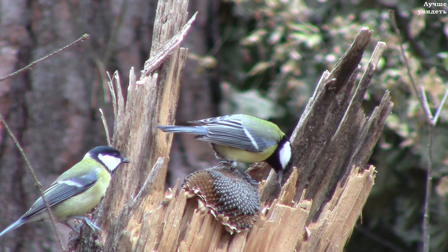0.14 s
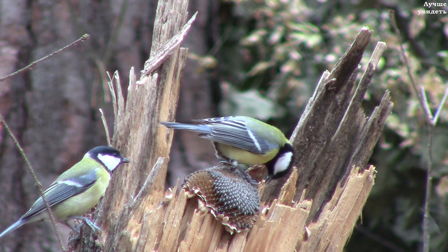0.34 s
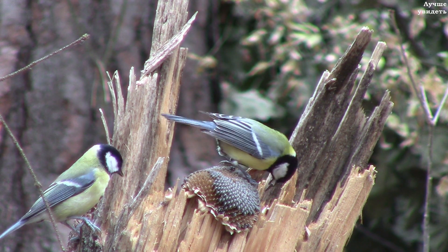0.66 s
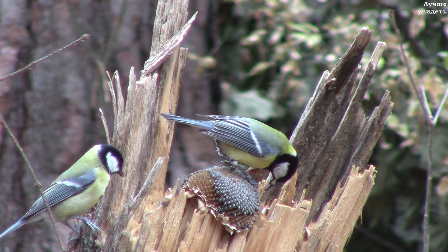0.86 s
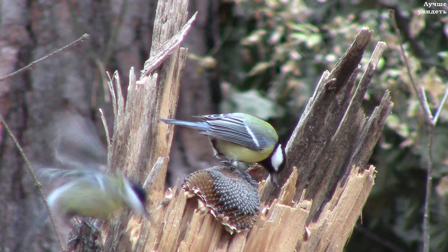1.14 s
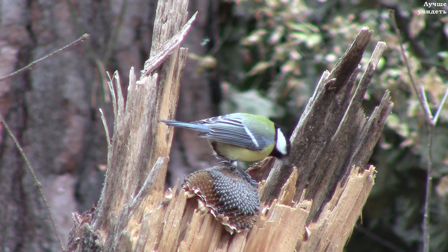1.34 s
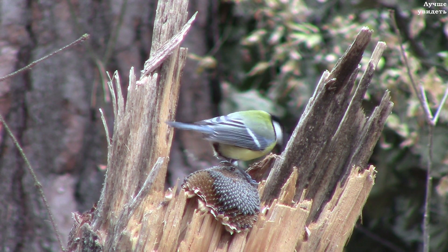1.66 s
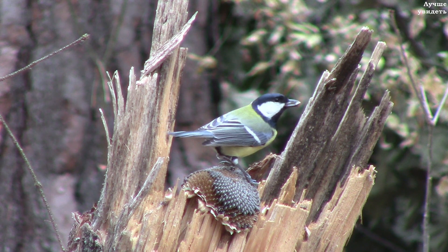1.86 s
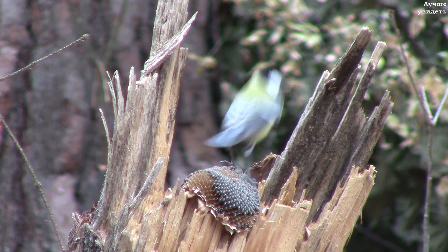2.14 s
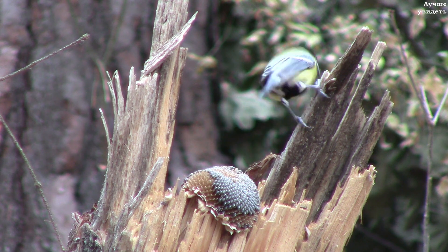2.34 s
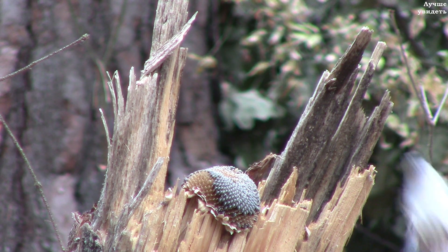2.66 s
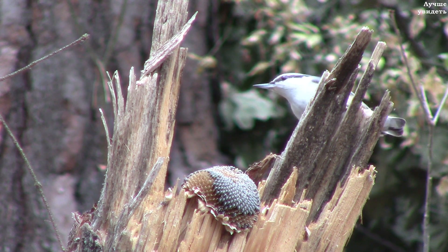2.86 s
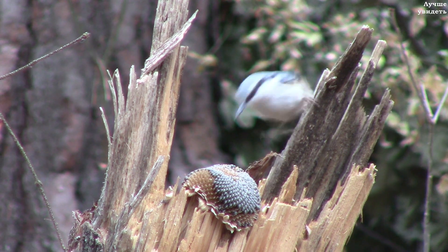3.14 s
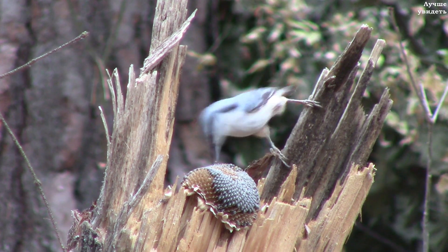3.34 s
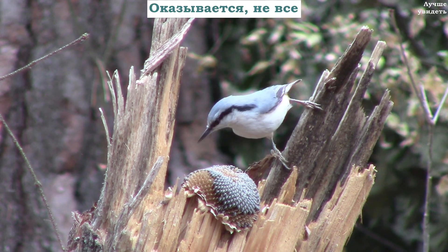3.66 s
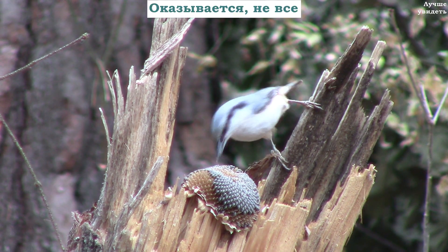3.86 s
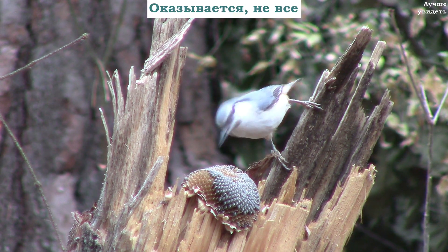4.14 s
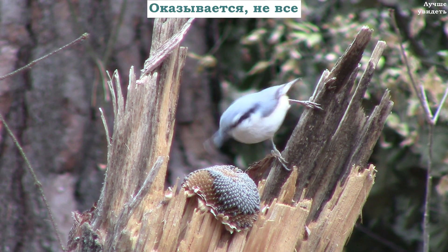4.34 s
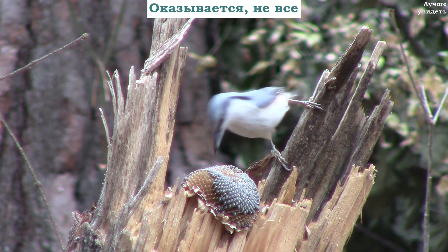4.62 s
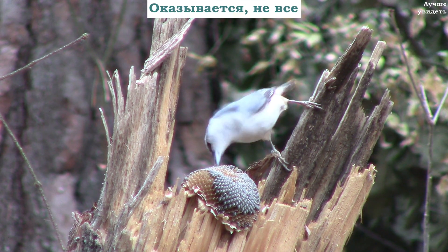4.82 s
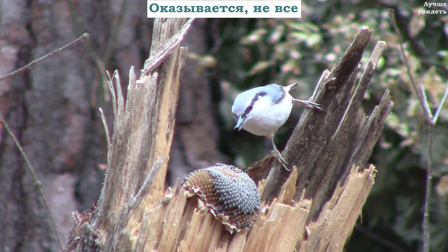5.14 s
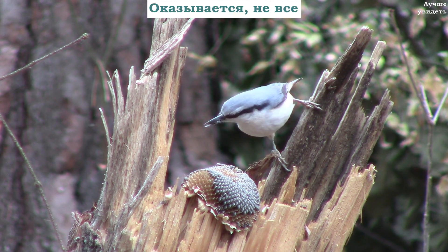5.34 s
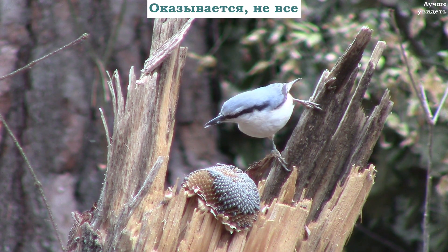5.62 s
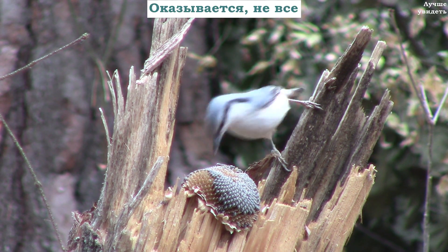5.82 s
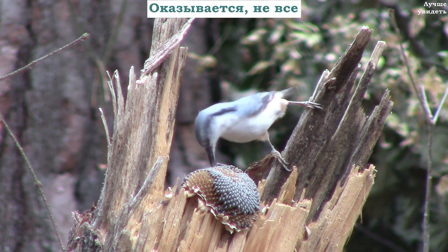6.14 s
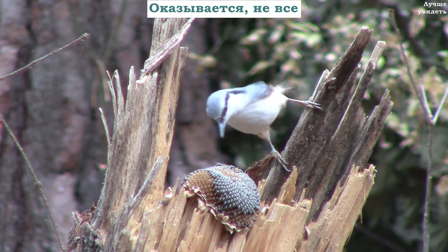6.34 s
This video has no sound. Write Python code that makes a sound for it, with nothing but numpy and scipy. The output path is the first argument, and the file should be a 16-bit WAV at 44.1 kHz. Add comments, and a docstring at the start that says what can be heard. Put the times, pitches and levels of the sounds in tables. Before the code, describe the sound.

A low distant rumble, a forest wash and a soft hiss run throughout. Two very faint bird whistles sound at the start. From about 0.6 to 2.1 seconds a small bird pecks at a dry sunflower head with sharp little clicks, the loudest cluster of husk cracks coming near 1.6 seconds, followed by faint rustles. At 2.6 seconds the main sound begins, slightly to the left: a nuthatch trill of about twenty quick, high, arched notes that ring among the trees. It speeds up, then slows, sinks a little in pitch and weakens, ending near 5.3 seconds. Around 3 seconds the background dips briefly and a faint far hum swells and fades. A few light ticks and a thin high chirp fall between 4.8 and 5.2 seconds. A short dry rustle comes at 5.7 seconds and a soft dull knock at 6.

```python
"""A low distant rumble, a forest wash and a soft hiss come first and lie under everything.
A tit pecks seeds from a dry sunflower head: husks crack and ring. The head knocks dully and rustles.
Then the main source, a nuthatch beside the feeding stump: 21 quick arched notes, syrinx overtones
shaped by the throat, speed up, then slow and sink, ringing on among the trees.
Faint extras: thin whistles of other birds, one far hum, a last rustle and knock on the seed head."""
import sys
import numpy as np
from scipy import signal
from scipy.fft import rfft, irfft, next_fast_len
from scipy.io import wavfile
from scipy.ndimage import uniform_filter1d, map_coordinates

SR = 44100
rng = np.random.default_rng(int(sys.argv[2]) if len(sys.argv) > 2 else 0)


def output_pcm(signal):
    """Save a mono or channel-first signal as 16-bit PCM at the path in sys.argv[1].

    Samples are clipped to [-1, 1] before scaling.
    """
    pcm = np.clip(np.atleast_2d(signal).T, -1, 1) * 32767
    wavfile.write(sys.argv[1], SR, np.round(pcm).astype(np.int16))


N = 286209
TOP_HZ = 15720

# noise spectra (frequency [Hz], relative density [dB])
RUMBLE_SPECTRUM = [(23, -38), (29, -32), (34, 0), (43, -16), (55, -4), (69, 3), (88, -4), (110, -5),
                   (150, -7), (200, -17.5), (350, -47)]
FOREST_SPECTRUM = [(100, -22), (200, 0), (330, -1.5), (500, 0.5), (750, -3), (1050, -5.5), (1500, -11),
                   (2200, -16.5), (4000, -25), (8000, -76)]
HISS_SPECTRUM = [(1000, 4), (4000, 3), (7000, 1), (9000, -2), (11000, -6), (13000, -9.5), (15000, -24),
                 (15800, -26)]
HUSK_SPECTRUM = [(1500, -8), (3000, 1), (8000, 0), (11000, -4), (15000, -18)]
# left-right likeness of noise (frequency [Hz], correlation [ratio])
STEREO_CORRELATION = [(60, 1), (130, 0.91), (290, 0.48), (640, 0.73), (1410, 0.42), (3100, 0.15),
                      (6820, 0.38), (15000, 0.15)]

# calls of other small birds (time [s], level [dB], start [Hz], end [Hz], length [s])
WHISTLES = [(.1, -62, 4400, 4280, .16), (0.293, -62, 4330, 4270, .12), (5.221, -45.5, 8000, 7550, 0.04)]
# feather and husk scrapes (time [s], level [dB], t60 [s])
SCRAPES = [(1.81, -48, .5), (2.16, -48, 0.65), (5.676, -45, .22), (5.728, -41.5, 0.28), (5.77, -43, 0.39)]
# bill on husks (time [s], level [dB], ring pitch [Hz])
BILL_STRIKES = [(.624, -33, 5800), (.976, -40, 5400), (.9892, -36, 5040), (1.1005, -29, 3430),
                (1.1265, -31.5, 3770), (1.553, -35, 4050), (1.567, -33, 3950), (1.6323, -19, 2840),
                (1.6359, -13.5, 2660), (1.6386, -24, 3120), (1.652, -26, 2660), (1.6757, -27, 3030),
                (2.1081, -35, 2940), (4.775, -35, 8000), (4.79, -32, 2420), (4.978, -35, 9500)]
# husk modes (multiple of ring pitch [ratio], level [dB], share of t60 [ratio])
HUSK_MODES = [(0.999, 3.5, 0.91), (1.75, -18, 0.88), (2.8, -10, 0.5)]
# dull knocks on the seed head (time [s], relative level [dB], pitch [Hz], t60 [s])
HEAD_KNOCKS = [(1.6465, -20, 366, .035), (5.975, -33, 320, .07)]

# echo decay of stump and twigs, and of the forest (frequency [Hz], t60 [s])
TWIG_DECAY = [(1000, .2), (8000, 0.21)]
FOREST_DECAY = [(300, 0.23), (2000, 0.43), (3400, 0.71), (4200, 0.88), (8000, 0.47), (14000, 0.31)]
# colour of the forest tail (frequency [Hz], gain [dB])
FOLIAGE_GAIN = [(1200, -8), (2100, 5.5), (2600, 1.5), (3300, 10), (3750, 4.5), (3950, 0.5), (4170, 5),
                (5000, 4.5), (6200, 5), (8000, 12), (12000, -3)]
# single trunk reflections (delay [s], gain [dB])
TRUNK_ECHOES = [(.0068, -10.5), (0.032, -21), (.043, -22), (.083, -15.5)]

# nuthatch notes (time of arch top [s], level [dB])
TRILL_NOTES = [(2.601, -20.5), (2.8094, -26), (2.9818, -22.5), (3.139, -21.5), (3.2756, -21.5),
               (3.406, -22), (3.5362, -22.5), (3.661, -21), (3.779, -21.5), (3.8897, -21), (4.002, -21),
               (4.114, -21), (4.2206, -21), (4.328, -22.5), (4.4473, -23.5), (4.5809, -25.5),
               (4.7189, -24.5), (4.8517, -25), (4.9756, -25), (5.1084, -26.5), (5.272, -30.5)]
# pitch of one note (offset from top [half-lengths], share of top pitch [ratio])
NOTE_ARCH = [(-2, .59), (-1.2, .6), (-.9, .86), (-.5, .96), (-.05, 1), (.5, .98), (1.05, .9), (1.45, .77),
             (1.85, .58), (2.8, .42)]
# note envelope, a surge on each flank (offset from top [half-lengths], level [dB])
NOTE_SWELL = [(-3.5, -36), (-2.7, -24), (-1.8, -17), (-1.2, -10), (-.75, 1), (0, -1), (.85, 2), (1.35, -4),
              (1.8, -12), (2.8, -25)]
# syrinx harmonics (multiple of pitch [ratio], level [dB])
SYRINX_HARMONICS = [(1, -4), (2, 0), (3, -3.5), (4, -4), (5, -1), (6, -17)]
# resonances of throat and open bill (frequency [Hz], gain [dB])
THROAT_GAIN = [(900, -37), (1250, -0.5), (1700, -16.5), (2100, -12), (2500, 4), (3100, -5.5), (3700, 1),
               (4250, -0.5), (4900, -10), (6200, -18.5), (6900, -20.5), (7700, -20), (8700, -46),
               (14000, -34)]
# harmonics 3 and up along the trill (time [s], gain [dB])
TRILL_EDGE = [(2.6, 2.5), (2.81, -0.5), (3.15, -2), (3.7, 2.5), (4.3, 2.5), (5.3, 0)]


def amp(db):
    """Decibels to gain."""
    return 10 ** (np.asarray(db) / 20)


def unit(x):
    """Scale to rms 1."""
    return x / np.sqrt(np.mean(x ** 2) + 1e-20)


def along(points, hz):
    """(Hz, value) points read on a log axis."""
    knots_hz, values = np.transpose(points)
    return np.interp(np.log(hz + 1), np.log(knots_hz + 1), values)


def wobble(rate_hz, size):
    """Smooth random curve, rate_hz knots a second."""
    knots = rng.standard_normal(int(size * rate_hz / SR) + 4)
    return map_coordinates(knots, [np.arange(size) * rate_hz / SR])


def filtered(x, response):
    """Apply the gain response(hz)."""
    size = next_fast_len(N + SR // 2)
    return irfft(rfft(x, size) * response(np.fft.rfftfreq(size, 1 / SR)), size)[..., :N]


def add(track, start_s, sound):
    """Mix a sound into a track."""
    part = track[..., round(start_s * SR):][..., :sound.shape[-1]]
    part += sound[..., :part.shape[-1]]


def stereo_noise(spectrum):
    """Noise of rms 1, near mono in the bass, diffuse in the treble."""
    def mid_side_gain(hz):
        angle = np.arccos(np.clip(along(STEREO_CORRELATION, hz), -1, 1)) / 2
        return amp(along(spectrum, hz)) * [np.cos(angle), np.sin(angle)]
    mid, side = filtered(rng.standard_normal((2, N)), mid_side_gain)
    return unit(np.array([mid + side, mid - side]))


def bursts(rows, rise_share):
    """Envelope of quick-rising, decaying bursts, summed in power."""
    power, t = np.zeros(N), np.arange(SR) / SR
    for start_s, db, t60_s in rows:
        rise = 1 - np.exp(-t / (rise_share * t60_s))
        add(power, start_s, (amp(db - 60 * t / t60_s) * rise) ** 2)
    return np.sqrt(power)


def scatter(decay):
    """Stereo tail, energy 1 a side; each frequency dies at its own rate."""
    hz, t, spectra = signal.stft(rng.standard_normal((2, SR)), SR, nperseg=256)
    tail = signal.istft(spectra * amp(-60 * t / along(decay, hz)[:, None]), SR, nperseg=256)[1]
    return tail / np.linalg.norm(tail, axis=1, keepdims=True)


def background(dip_start_s=2.72, dip_end_s=3.05, fade_s=.012, settle_s=.25):
    """Restless rumble, forest wash and hiss; all dip briefly, rumble and wash return lower."""
    t = np.arange(N) / SR
    dip_db = -8.5 * np.clip(np.minimum(t - dip_start_s, dip_end_s - t) / fade_s, 0, 1)
    after = np.clip((t - dip_start_s) / fade_s, 0, 1)
    forest_db = -41.5 - 1.46 * after + 1.5 * np.exp(-t / settle_s)
    rumble = amp(-39.5 - 2 * after + dip_db + .4 * wobble(4.9, N)) * stereo_noise(RUMBLE_SPECTRUM)
    forest = amp(forest_db + dip_db + .29 * wobble(14, N)) * stereo_noise(FOREST_SPECTRUM)
    hiss = amp(-52.5 + .33 * dip_db + .32 * wobble(8.6, N)) * stereo_noise(HISS_SPECTRUM)
    return (rumble + forest + hiss) * amp([[.4], [-.4]])


def distant_hum(hz=240, level_db=-49.5, peak_s=3.11, width_s=.4):
    """A faint, wavering low tone swells once and fades."""
    pitch_hz = hz * (1 + .0155 * wobble(20, N))
    swell = np.exp(-((np.arange(N) / SR - peak_s) / width_s) ** 2 / 2)
    return swell * amp(level_db + .99 * wobble(17, N)) * np.sin(2 * np.pi * np.cumsum(pitch_hz) / SR)


def small_birds():
    """Short, pure, slightly falling whistles."""
    out = np.zeros(N)
    for start_s, db, start_hz, end_hz, length_s in WHISTLES:
        pitch_hz = np.linspace(start_hz, end_hz, round(length_s * SR))
        tone = np.sin(2 * np.pi * np.cumsum(pitch_hz) / SR)
        add(out, start_s, amp(db) * np.hanning(len(tone)) * tone)
    return out


def rustle(grain_db=4):
    """Feathers and dry husks scrape in tiny uneven bursts."""
    grains = stereo_noise(HUSK_SPECTRUM) * amp(grain_db * wobble(500, N))
    return bursts(SCRAPES, rise_share=.034) * unit(grains)


def seed_head_pecks(tap_cycles=95, crack_cycles=38, attack_s=.00018, knock_attack_s=.0024):
    """Husks crack and ring, hard hits for fewer cycles; dull knocks on the seed head; twigs echo."""
    out, t = np.zeros(N), np.arange(SR // 8) / SR
    for start_s, db, hz in BILL_STRIKES:
        hardness = np.interp(db, [-28, -18], [0, 1])
        softness = 1.5 - hardness
        t60_s = (tap_cycles + hardness * (crack_cycles - tap_cycles)) / hz
        decay_db = -60 * t / t60_s
        ring = sum(np.sin(2 * np.pi * k * hz * t + .5 * wobble(780, len(t)))
                   * amp(mode_db + decay_db / t60_share)
                   for k, mode_db, t60_share in HUSK_MODES if k * hz < TOP_HZ)
        ring *= amp(-6 * softness)
        band = signal.butter(2, [hz * .88, min(hz * 1.6, SR * .4)], "band", fs=SR, output="sos")
        grit = rng.standard_normal(len(t))
        crack = amp(-9) * unit(signal.sosfilt(band, grit))
        fizz = amp(-16 - 3 * softness) * grit
        peck = ring + (crack + fizz) * amp(decay_db)
        add(out, start_s, amp(db) * peck * (1 - np.exp(-t / attack_s)))
    for start_s, db, hz, t60_s in HEAD_KNOCKS:
        envelope = amp(db + 3.5 - 60 * t / t60_s) * (1 - np.exp(-t / knock_attack_s))
        add(out, start_s, -np.sin(2 * np.pi * hz * t) * envelope)
    echo = signal.fftconvolve(out[None], scatter(TWIG_DECAY), axes=1)[:, :N]
    return out * amp([[.5], [-.5]]) + amp(-15) * echo


def woods(sound, direct_db, right_db=-4.5, near_db=-9, near_t60_s=.029):
    """Direct path from the left, scatter off stump and twigs, trunk echoes, long forest tail."""
    near = amp(near_db) * scatter([(1000, near_t60_s)])[0]
    near[0] += amp(direct_db)
    for delay_s, db in TRUNK_ECHOES:
        near[round(abs(delay_s + rng.normal(0, .0003)) * SR)] += amp(db)
    ears = np.array([near, amp(right_db) * np.roll(near, 1)])  # right lags one sample
    hz = np.fft.rfftfreq(len(near), 1 / SR)
    far = irfft(rfft(scatter(FOREST_DECAY)) * amp(along(FOLIAGE_GAIN, hz) - 8.5))
    return signal.fftconvolve(sound[None], ears + far * amp([[0], [-2]]), axes=1)


def syrinx_note(top_hz, half_s, lead_boost_db, edge_db, flutter_db=1):
    """A hoarse lead-in leaps to a clean arch and falls; harmonics flare at throat resonances."""
    offset = np.arange(-4 * half_s, 3 * half_s, 1 / SR) / half_s
    size = len(offset)
    lead_in = np.clip(-2 * offset - 1.4, 0, 1)
    fall = np.clip(2 * (offset - 1), 0, 1)
    pitch_hz = top_hz * uniform_filter1d(np.interp(offset, *np.transpose(NOTE_ARCH)), size=70)
    pitch_hz *= 1 + (.0089 + .047 * lead_in) * wobble(706, size)  # jitter: hoarseness
    phase = 2 * np.pi * np.cumsum(pitch_hz) / SR
    voice = sum(amp(db + edge_db * (k > 2) + along(THROAT_GAIN, k * pitch_hz)) * np.sin(k * phase)
                for k, db in SYRINX_HARMONICS)
    rasp = amp(-23) * uniform_filter1d(rng.standard_normal(size), size=3)
    swell_db = np.interp(offset, *np.transpose(NOTE_SWELL), left=-120, right=-120)
    swell_db += lead_boost_db * (lead_in + .47 * fall)
    return (voice + rasp) * amp(swell_db + flutter_db * wobble(400, size))


def nuthatch(pitch_hz=2116.5, tires_s=4.0, sag_hz_per_s2=93.2, usual_gap_s=.13, trail_t60_s=.74):
    """The trill sinks as the bird tires; it shifts, so each note takes new paths through the trees."""
    out, trails = np.zeros((2, N)), []
    gaps_s = np.gradient([top_s for top_s, db in TRILL_NOTES])
    for (top_s, db), gap_s in zip(TRILL_NOTES, gaps_s):
        top_hz = pitch_hz - sag_hz_per_s2 * max(top_s - tires_s, 0) ** 2
        half_s = .0077 * (gap_s / usual_gap_s) ** .54  # hurried notes are shorter
        edge_db = np.interp(top_s, *np.transpose(TRILL_EDGE))
        lead_boost_db = -20.5 - db  # lead-in stays as loud in weak notes
        facing_db = .3 * (db + 20)  # head turn: this part of the level skips the echo
        note = syrinx_note(top_hz, half_s, lead_boost_db, edge_db)
        heard = woods(note, direct_db=2 + facing_db)
        add(out, top_s - 4 * half_s, amp(db + .5 - facing_db) * heard)
        trails.append((top_s - 2 * half_s, db - 24, trail_t60_s))
    lingering_hiss = bursts(trails, rise_share=.031) * stereo_noise(HISS_SPECTRUM)
    return out + lingering_hiss


def scene():
    """Birds at the stump over the forest background."""
    return nuthatch() + seed_head_pecks() + small_birds() + rustle() + distant_hum() + background()


def record(dry):
    """Brick-wall low-pass at TOP_HZ."""
    return filtered(dry, lambda hz: hz < TOP_HZ)


dry = scene()
out = record(dry)
output_pcm(out)
```